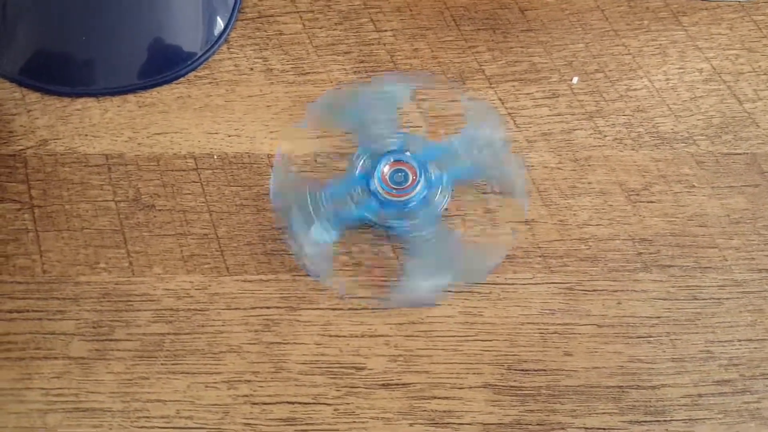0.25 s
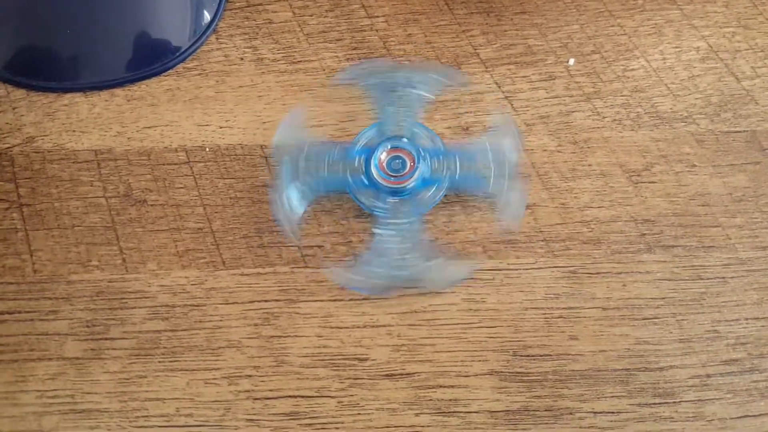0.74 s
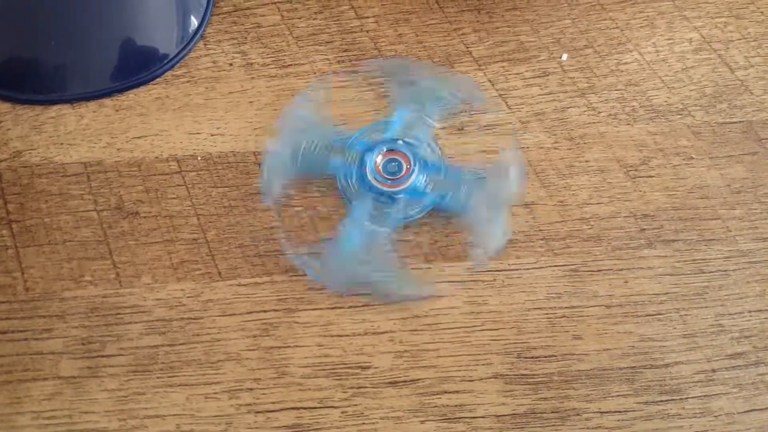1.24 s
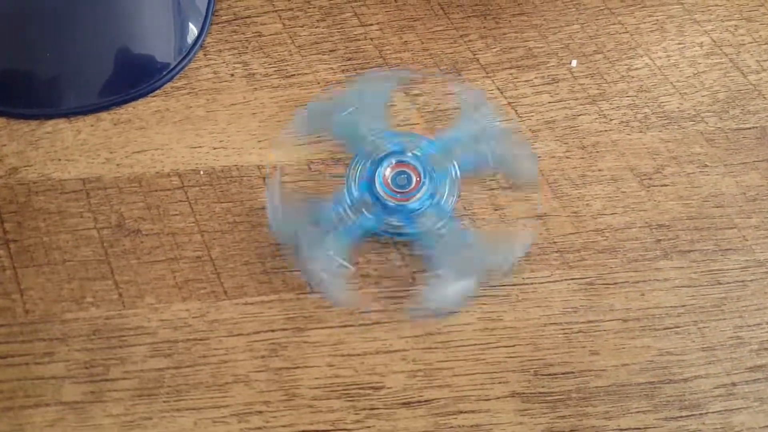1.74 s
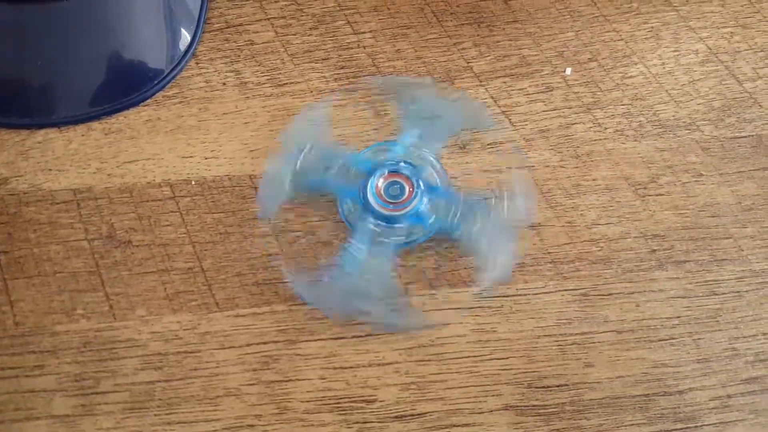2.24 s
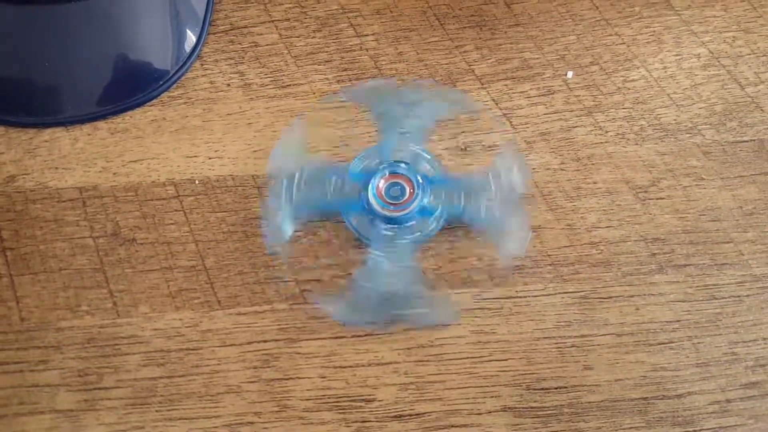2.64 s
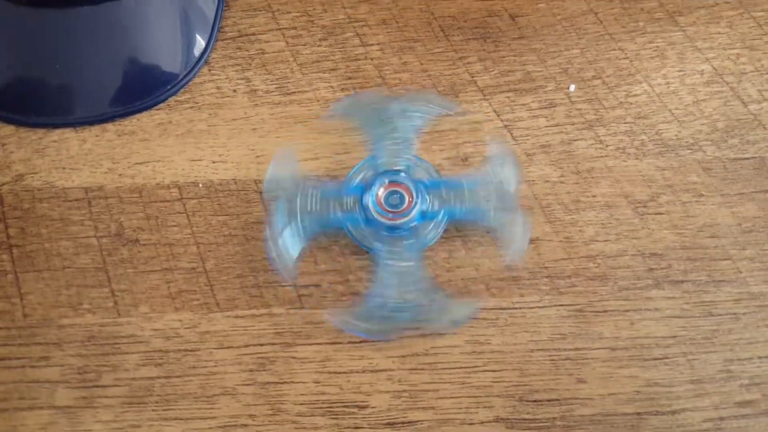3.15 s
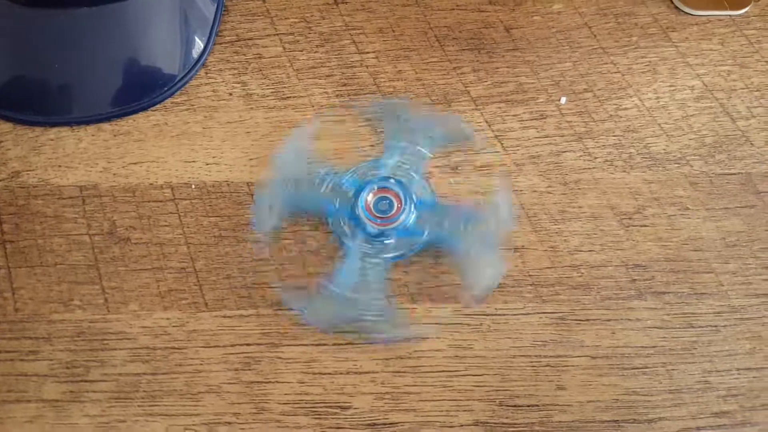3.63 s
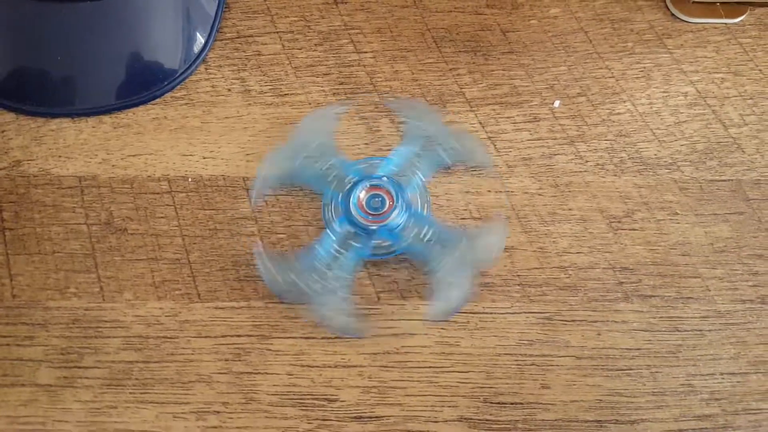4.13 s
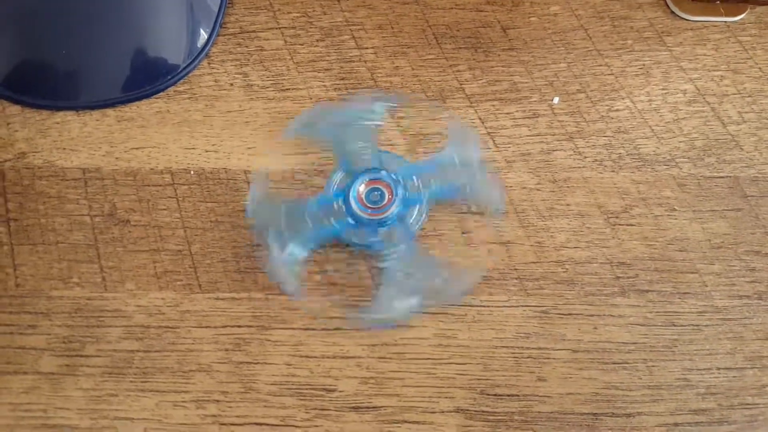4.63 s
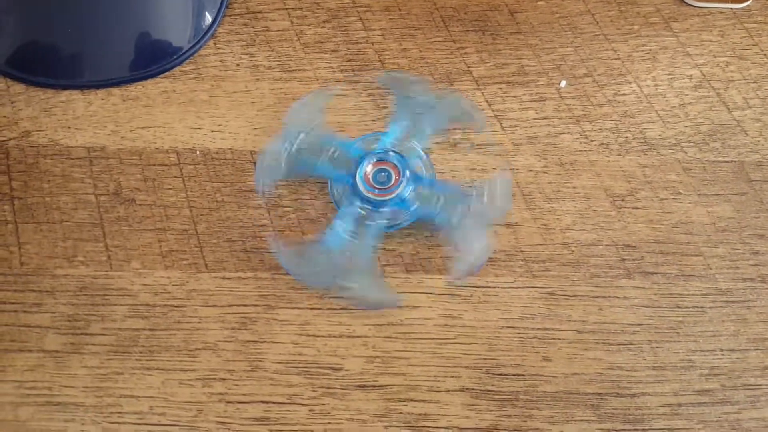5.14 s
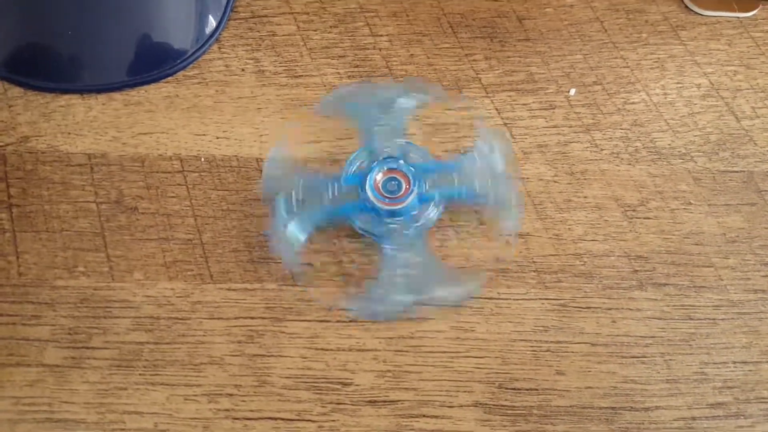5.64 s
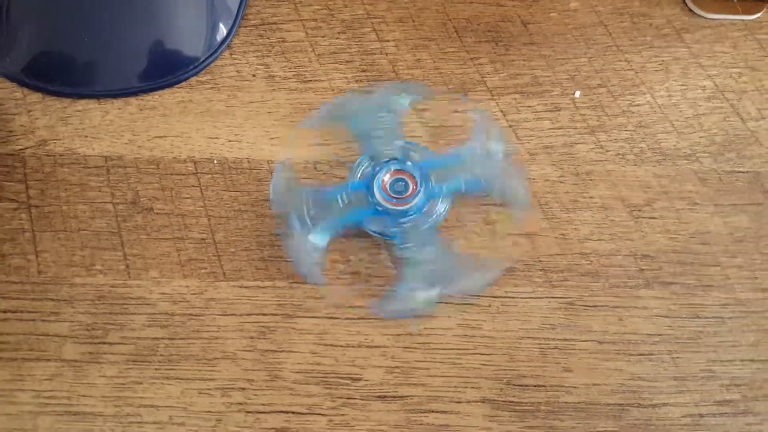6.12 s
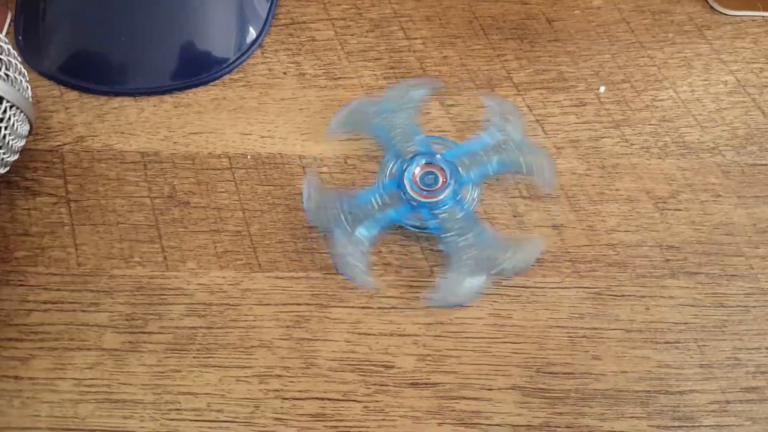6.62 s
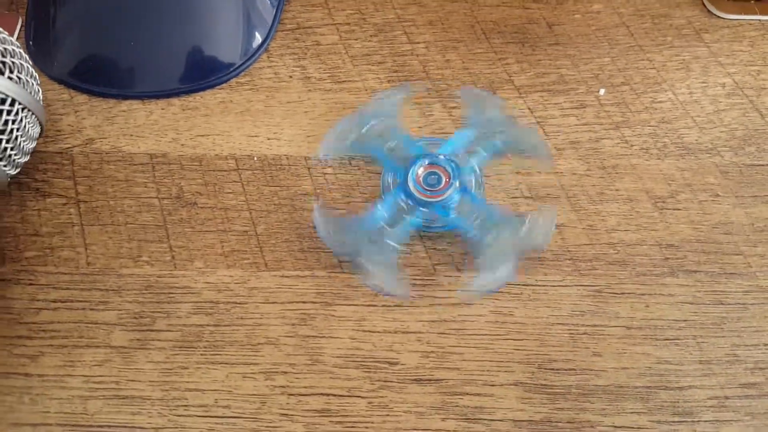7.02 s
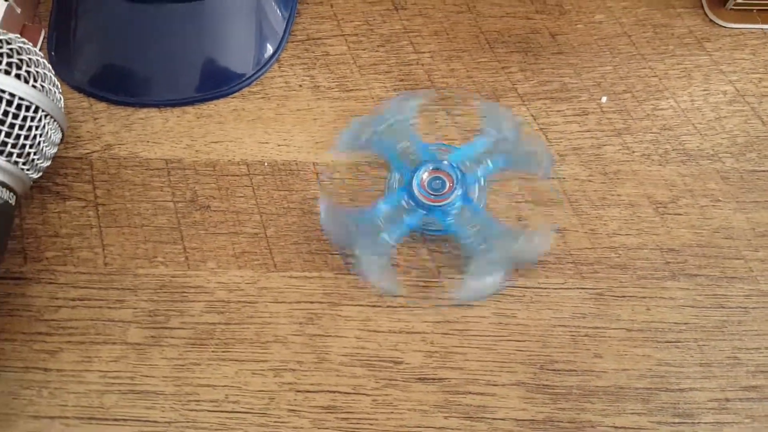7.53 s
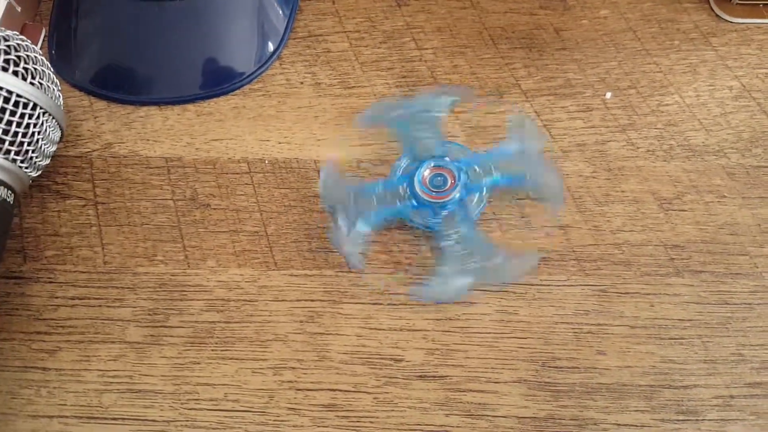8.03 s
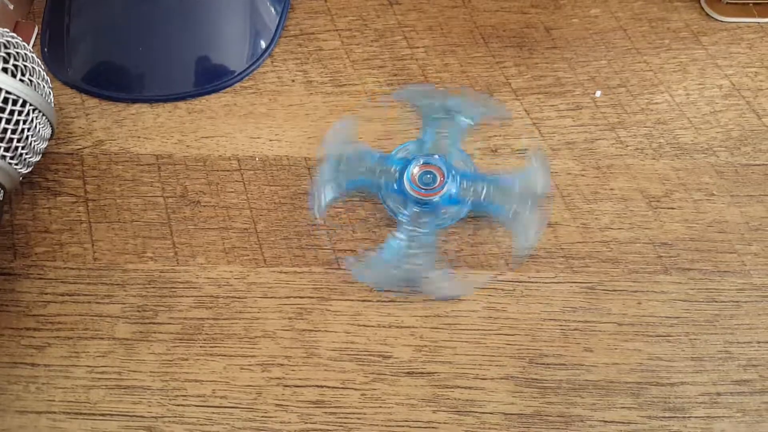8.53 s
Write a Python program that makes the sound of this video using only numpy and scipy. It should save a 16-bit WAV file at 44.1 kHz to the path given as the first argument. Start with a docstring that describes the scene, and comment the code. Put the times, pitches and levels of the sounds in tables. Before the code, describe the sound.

A plastic fidget spinner coasts on a wooden table with a soft, grainy whir. Its steel bearing adds a fine sizzle and light, irregular high ticks. Around the middle, a few small dry knocks, tiny squeaks and brief rubs come close to the microphone. The spinning sound gradually weakens as it slows, while a low appliance hum and room rumble carry on throughout.

```python
"""From the start a plastic fidget spinner coasts on a wooden table while an appliance hums and rumbles.
Its rolling balls excite body and tabletop into a grainy whir, and the steel races into a fine sizzle.
The bearing ticks throughout, with a few brief rubs; mostly from 2.6 to 6 s, something close to the
microphone squeaks and knocks. Midway the ball cage rings more strongly and a faint high whine sets in.
By the end, at almost 9 s, the spin has slowed and the rolling has faded; the hum carries on."""
import sys
import numpy as np
from scipy import signal
from scipy.fft import rfft, irfft
from scipy.io import wavfile
from scipy.ndimage import uniform_filter1d

SR = 44100
rng = np.random.default_rng(int(sys.argv[2]) if len(sys.argv) > 2 else 0)


def dump_mix(stems):
    """Bounce the given channels to the path in sys.argv[1] as a 16-bit WAV at rate SR."""
    frames = np.atleast_2d(stems).T  # one column per channel
    limited = np.clip(frames, -1, 1)  # hard clip at full scale
    pcm = np.round(limited * 32767).astype(np.int16)
    wavfile.write(sys.argv[1], SR, pcm)


N = 386757
TIME = np.arange(N) / SR


def from_db(db):
    """Amplitude ratio of a level in decibels."""
    return 10 ** (np.asarray(db) / 20)


def unit_rms(x):
    """Normalisation to unit mean power."""
    return x / np.sqrt(np.mean(x ** 2) + 1e-20)


def panned(x, pan_db):
    """Constant-power panning: pan is the left level minus the right."""
    return x * unit_rms(from_db([[pan_db / 2], [-pan_db / 2]]))


def at_hz(points, hz):
    """Interpolation of a spectrum over log frequency."""
    centres, values = np.transpose(points)
    return np.interp(np.log(hz + 1e-9), np.log(centres), values)


def drift(corner_hz):
    """Slow random modulation: low-passed noise of rms 1."""
    step = 40
    r = np.exp(-2 * np.pi * corner_hz * step / SR)
    slow = signal.lfilter([1], [1, -2 * r, r * r], rng.standard_normal(N // step + 2002))[2000:]
    return np.interp(np.arange(N) / step, np.arange(len(slow)), unit_rms(slow))


def resonate(x, hz, width_hz):
    """Forced response of a damped resonator with unit peak gain."""
    r = np.exp(-np.pi * width_hz / SR)
    feedback = [1, -2 * r * np.cos(2 * np.pi * hz / SR), r * r]
    return signal.lfilter(np.array([1, 0, -1]) * (1 - r * r) / 2, feedback, x + 1e-18)


def bandpass(x, band_hz):
    """Band limiting with slopes of 12 dB per octave."""
    return signal.sosfilt(signal.butter(2, band_hz, "band", fs=SR, output="sos"), x)


def grains(per_s, spread_db, size=N, coherence=0.41):
    """Shot noise: random impacts of uneven strength, partly correlated between the sides."""
    hits = rng.random(size) < per_s / SR
    common = np.sqrt(coherence) * rng.standard_normal(size)
    separate = np.sqrt(1 - coherence) * rng.standard_normal((2, size))
    return hits * from_db(spread_db * np.clip(rng.standard_normal(size), -2, 2)) * (common + separate)


def add(out, s, sound):
    """Superposition of a short stereo sound at time s."""
    start = max(round(s * SR), 0)
    out[:, start:start + sound.shape[1]] += sound[:, :N - start]


# Room rumble and hiss: (frequency [Hz], relative spectral density [dB])
ROOM_SPECTRUM = [(20, -21), (38, -21.5), (55, -7.5), (72, -11.5), (95, -3.5), (132, -0.5), (155, -5),
                 (175, -4), (210, -11), (250, -8), (285, -11), (350, -11), (445, -23.5), (490, -17.5),
                 (680, -24.5), (1400, -21.5), (2400, -26.5), (3000, -32.5), (3900, -36), (4600, -36.5),
                 (6500, -43), (8300, -43.5), (10300, -44.5), (11400, -48), (13000, -43.5), (14500, -49),
                 (15500, -54)]
# Likeness of left and right in the room: (frequency [Hz], correlation [-1 to 1])
ROOM_CORRELATION = [(60, 1), (150, 0.87), (260, 0.97), (500, 0.78), (900, 0.68), (3000, -0.4),
                    (15000, -0.015)]
def room(level_db=-50):
    """Diffuse field: the sides agree at long wavelengths and lose their likeness at short ones."""
    hz = np.arange(N // 2 + 1) * SR / N
    correlation = np.clip(at_hz(ROOM_CORRELATION, hz), -1, 1)
    mid, side = rfft(rng.standard_normal((2, N))) * from_db(at_hz(ROOM_SPECTRUM, hz))
    air = irfft(np.sqrt(1 + correlation) * mid + np.sqrt(1 - correlation) * side * [[1], [-1]], N)
    return from_db(level_db) * panned(unit_rms(air), pan_db=0.5)


# Mains and motor tones: (frequency [Hz], rms level [dB], modulation depth [0 to 1])
HUM_TONES = [(60.2, -69.5, 0.4), (119.96, -49, 0.18), (166.2, -59.5, 0.56), (218.3, -68.5, 0.6),
             (233.4, -69.5, 0.1), (257.6, -59, 0.2), (296.3, -70, 0.5), (363, -73, 0.58), (484, -71, 0.8)]
def hum():
    """Forced vibration of an appliance: each tone wavers in amplitude and phase."""
    out = np.zeros(N)
    for hz, db, depth in HUM_TONES:
        waver = 1 + depth * (drift(2.86) + 1j * drift(2.24))
        tone = np.real(waver * np.exp(2j * np.pi * (hz * TIME + rng.random())))
        out += from_db(db) * unit_rms(tone)
    return panned(out, pan_db=0.4)


def whine(start_s=3.9, start_db=-91, growth_db_per_s=0.8, pitches_hz=(9750, 9370), waver_hz=12):
    """Frequency modulation: a faint, growing tone wavers and hops between two pitches."""
    hops_s = (5.35, 6.52, 7.56)
    lower = np.searchsorted(hops_s, TIME) % 2
    hz = np.array(pitches_hz)[lower] + waver_hz * drift(12)
    db = start_db + growth_db_per_s * (TIME - start_s) - 3 * lower  # the lower pitch is softer
    return (TIME > start_s) * from_db(db) * np.sqrt(2) * np.sin(2 * np.pi * np.cumsum(hz) / SR)


def reflections(x, t60_s=0.15, level_db=-13):
    """Reverberation: nearby surfaces return a dense, decaying tail, different on each side."""
    t = np.arange(SR // 4) / SR
    tail = rng.standard_normal((2, len(t))) * np.exp(-np.log(1000) * t / t60_s) * (t > .002)
    tail /= np.sqrt(np.sum(tail ** 2, axis=1, keepdims=True))
    return from_db(level_db) * signal.fftconvolve(x, tail, axes=1)[:, :N]


def path_delay(x, lag_s=0.0002):
    """Travel time: the longer path makes the sound arrive later on the right."""
    return np.array([x[0], np.pad(x[1], (round(lag_s * SR), 0))[:N]])


# Short creaky squeaks: (time [s], level [dB], relative overtone level [dB], pitch [Hz], hold [s])
CREAKY_SQUEAKS = [(0.053, -57, -7, 2600, 0.005), (2.607, -55, -11, 2690, 0.0083),
                  (2.6195, -45.5, 2, 2630, 0.0018), (2.635, -60, -9, 2840, 0.0061),
                  (5.610, -63, -16, 2660, 0.0046), (5.734, -55, -20, 2660, 0.0071),
                  (5.757, -62, -7, 2610, 0.005), (5.82, -61, -16, 2670, 0.008),
                  (5.868, -64, -14, 2700, 0.005), (5.913, -69, -14, 2790, 0.004),
                  (5.974, -62, -17, 2790, 0.0071)]
def squeaks(attack_s=0.00088, t60_s=0.024, overtone_t60_s=0.008, jitter_rad=0.063, roughness=0.28):
    """Stick-slip oscillation holds a rough tone and its overtone briefly; then both decay freely."""
    out, t = np.zeros((2, N)), np.arange(SR // 16) / SR
    attack = 1 - np.exp(-t / attack_s)
    for s, db, overtone_db, hz, hold_s in CREAKY_SQUEAKS:
        phase = 2 * np.pi * hz * t + np.cumsum(jitter_rad * rng.standard_normal(len(t)))
        decay = -np.log(1000) * np.maximum(t - hold_s, 0)
        grip = 1 + roughness * unit_rms(uniform_filter1d(rng.standard_normal(len(t)), size=SR // 2000))
        tone = panned(np.sin(phase) * np.exp(decay / t60_s), pan_db=5)
        overtone = panned(np.sin(1.95 * phase) * np.exp(decay / overtone_t60_s), pan_db=-21)
        add(out, s, from_db(db) * np.sqrt(2) * attack * grip * (tone + from_db(overtone_db) * overtone))
    return out


def ring(hz, t60_s, phase_rad=0.31):
    """Free decay of a struck mode, peak 1; the initial phase gives a sharp front edge."""
    t = np.arange(SR // 16) / SR
    wave = -np.sin(2 * np.pi * hz * t + phase_rad) * np.exp(-np.log(1000) * t / t60_s)
    return wave / np.abs(wave).max()


# Dry knocks: (time [s], snap level [dB], snap frequency [Hz], snap pan [dB], thud level [dB])
HANDLING_KNOCKS = [(2.6203, -36, 1600, 4, -55), (3.5724, -27, 1330, -36, -36.5),
                   (5.2551, -36.5, 1400, 4, -37.5), (5.441, -31, 2630, 30, -30),
                   (5.454, -50, 2000, -5, -42)]
def knocks(snap_cycles=4.4):
    """Heavy damping: dry knocks close to the microphone, each a short snap over a dull thud."""
    out = np.zeros((2, N))
    thud = panned(ring(hz=593, t60_s=0.0046), pan_db=-19)
    for s, snap_db, hz, pan, thud_db in HANDLING_KNOCKS:
        snap = panned(ring(hz, snap_cycles / hz), pan)
        add(out, s, from_db(snap_db) * snap + from_db(thud_db) * thud)
    return out


# Brief rubs: (time [s], duration [s], rms level [dB], centre [Hz], bandwidth [Hz], pan [dB])
BRIEF_RUBS = [(0.049, 0.0097, -57, 4080, 1290, -3), (1.795, 0.0053, -45, 11600, 4000, -3),
              (2.599, 0.016, -64, 3900, 1800, -3), (2.618, 0.0058, -60, 8700, 1200, -4),
              (4.558, 0.039, -55, 1500, 2880, -16), (5.419, 0.022, -60.5, 9000, 6000, 9),
              (5.735, 0.008, -63, 3600, 900, -9), (5.748, 0.0064, -58.5, 7000, 1800, -16),
              (5.817, 0.013, -64, 3880, 1400, -6), (8.037, 0.0093, -63, 3780, 2500, -2)]
def rubs():
    """Sliding friction: plastic brushes past in short swells of gritty noise."""
    out = np.zeros((2, N))
    for s, length_s, db, hz, width_hz, pan in BRIEF_RUBS:
        swell = np.hanning(round(length_s * SR))
        grit = grains(per_s=8000, spread_db=2, size=SR // 4)[:, :len(swell)]
        add(out, s, from_db(db) * panned(unit_rms(resonate(grit, hz, width_hz) * swell), pan))
    return out


# Narrow bearing resonances: (frequency [Hz], bandwidth [Hz], initial rms level [dB])
BEARING_MODES = [(1467, 18, -66), (4700, 210, -79.5), (5380, 35, -79.5)]
def singing(waver_db=3.5, fade_db_per_s=2.3):
    """Resonance: the balls keep lightly damped modes of the bearing ringing while it runs fast."""
    impacts = grains(per_s=2500, spread_db=3.5) * from_db(waver_db * drift(4.6))
    modes = sum(from_db(db) * unit_rms(resonate(impacts, hz, width)) for hz, width, db in BEARING_MODES)
    return from_db(-fade_db_per_s * TIME) * panned(modes, pan_db=5)


# Modes of the steel races and balls: (frequency [Hz], bandwidth [Hz], gain [dB], pan [dB])
RACE_MODES = [(3250, 250, -3, 2), (4620, 380, -2, 1), (6000, 600, -5, 4), (7520, 330, 3, 8),
              (8200, 480, -1, 6), (9300, 450, -7.5, 4), (11000, 350, -5.5, -1), (11500, 500, -7.5, 2),
              (12430, 380, -2, 3), (13270, 300, 2, 2), (14020, 300, 0, 2), (14780, 150, -9, 2)]
def races(impacts, drives_db):
    """Modal superposition: each steel mode rings as strongly as the point of contact drives it."""
    return sum(from_db(db) * panned(resonate(impacts * from_db(drive), hz, width), pan)
               for drive, (hz, width, db, pan) in zip(drives_db, RACE_MODES))


def catch(hz, second_hz, second_db, rise_s=0.00076, fall_s=0.0039, width_hz=460):
    """Transient excitation: a flurry of impacts rings the races, most in two bands; greatest rms 1."""
    t = np.arange(SR // 32) / SR
    envelope = (1 - np.exp(-t / rise_s)) * np.exp(-(t / fall_s) ** 2 / 2)
    flurry = grains(per_s=7000, spread_db=5, size=len(t)) * envelope
    octaves_away = np.abs(np.log2(np.array(RACE_MODES)[:, 0] / hz))
    drives_db = 2.5 * rng.standard_normal(len(RACE_MODES)) - 3 * octaves_away
    main = unit_rms(resonate(flurry, hz, width_hz))
    second = from_db(second_db) * unit_rms(resonate(flurry, second_hz, width_hz))
    steel = from_db(-3) * unit_rms(races(flurry, drives_db))
    crack = from_db(-6.5) * unit_rms(flurry)
    tick = bandpass(main + second + steel + crack, band_hz=(4200, 14800))
    tick /= np.sqrt(np.mean(tick ** 2, axis=1, keepdims=True))  # equal power on both sides
    running_power = uniform_filter1d(np.mean(tick ** 2, axis=0), size=SR // 250)
    return tick / np.sqrt(running_power.max())


def light_catches(count, start_db=-63.5, fade_db_per_s=0.6, spread_db=3.5, second_db=-4):
    """Random point process: rows like those of HARD_CATCHES, weaker as the spin runs down."""
    when, first, second = rng.random((count, 3)).T
    strength, side = rng.standard_normal((count, 2)).T
    s = when * N / SR
    db = start_db - fade_db_per_s * s + spread_db * strength
    pan_db = -1 + 3 * side
    upper_hz = np.array([hz for hz, _, gain_db, _ in RACE_MODES if hz > 7000 and gain_db > -3])
    hz, second_hz = upper_hz[(np.array([first, second]) * len(upper_hz)).astype(int)]
    return np.transpose([s, db, hz, second_hz, np.full(count, second_db), pan_db])


# Hard catches of the bearing:
# (time [s], level [dB], main ring [Hz], second ring [Hz], relative second level [dB], pan [dB])
HARD_CATCHES = [(0.17, -65, 13300, 7500, -10, 8), (0.181, -56, 13200, 4730, -12, 5),
                (0.226, -51, 12600, 7540, -4, 10), (0.247, -55, 13300, 5300, -8, 10),
                (0.372, -54, 7800, 5700, -12, 10), (0.443, -58, 13700, 8000, -3, 8),
                (0.463, -55, 8700, 7200, -8, 9), (0.497, -56.5, 7300, 5800, -5, 11),
                (0.549, -57, 13400, 7500, -2, 4), (0.78, -56, 12600, 7500, -3, 10),
                (0.904, -51, 7360, 4300, -9, 9), (0.912, -57, 13100, 4700, -3, 6),
                (1.159, -54.0, 7350, 5800, -6, 8), (1.273, -59, 7200, 4300, -9, 6),
                (1.367, -57, 7900, 4500, -7, 8), (1.374, -54.5, 8100, 4600, -6, 8),
                (1.533, -55.0, 7550, 5300, -9, 6), (1.868, -53, 7500, 9300, -5, 8),
                (1.88, -53.5, 7450, 5400, -7, 7), (1.886, -49.5, 7500, 4400, -10, 8),
                (1.965, -55.5, 13200, 8100, 0, 6), (2.07, -60, 13300, 4600, -5, 3),
                (2.193, -57, 14100, 7100, -2, 8), (2.239, -55.5, 8100, 6500, -6, 6),
                (2.281, -58, 7500, 5300, -9, 12), (2.341, -57.5, 8100, 13400, -2, 5),
                (2.477, -60, 8200, 12200, -1, 5), (2.555, -55, 13300, 7700, -5, 6),
                (2.595, -61.0, 5200, 7600, -5, -1), (2.747, -56.5, 7500, 4800, -9, 10),
                (2.842, -62, 9300, 7700, -2, 6), (2.919, -60, 8100, 4500, -3, 1),
                (3.007, -52.5, 13200, 5300, -11, 3), (3.126, -56, 7600, 4500, -3, 8),
                (3.162, -57, 13300, 7800, -2, 10), (3.214, -60, 8200, 4500, 3, 8),
                (3.27, -58.5, 13300, 7500, -5, 3), (3.283, -53, 13200, 7600, -3, 8),
                (3.287, -49.5, 13200, 7500, -17, 0), (3.317, -62, 7600, 4300, -11, 6),
                (3.492, -58.0, 7600, 13200, -5, 7), (3.638, -58.5, 8200, 10900, -4, 4),
                (3.927, -56.5, 12500, 4700, -12, 5), (3.98, -57, 14000, 7800, -1, 6),
                (4.096, -62, 13900, 11400, -5, 4), (4.204, -63, 14000, 4500, -11, 9),
                (4.21, -51, 13200, 7400, -13, 4), (4.317, -55.5, 13300, 7400, -11, 5),
                (4.364, -54, 12400, 7500, -8, 5), (4.519, -55.5, 13700, 8300, -11, 5),
                (4.617, -57, 14000, 7500, -4, 4), (5.147, -57.5, 13200, 7300, -12, 1),
                (5.257, -56.5, 10500, 4700, -10, -4), (5.297, -57, 14000, 5800, -5, 5),
                (5.313, -63.0, 12500, 14300, -1, 7), (5.439, -48.5, 13500, 4800, -10, 8),
                (5.71, -61, 13000, 7500, -3, 6), (5.826, -60, 13200, 4500, -4, -5),
                (5.982, -57, 13000, 4600, -19, 5), (6.164, -54, 11200, 4630, -2, 4),
                (6.208, -62, 13200, 7400, -3, 7), (6.339, -62, 13900, 5100, -10, 6),
                (6.453, -61.5, 14000, 8600, -6, 9), (6.683, -58.5, 7300, 4600, -7, 4),
                (6.856, -55, 14000, 8400, -1, 3), (7.024, -57.5, 14000, 4700, -16, -1),
                (7.189, -62.5, 13300, 4800, -9, 5), (7.208, -63, 14300, 7200, -4, 6),
                (7.274, -62, 7550, 4500, -7, 6), (7.398, -64, 13200, 4500, -6, 5),
                (7.58, -63.0, 14400, 7800, -5, 5), (7.725, -62.0, 7300, 4400, -9, 6),
                (7.869, -63.5, 7900, 9500, -2, 7), (7.884, -64.0, 9500, 8000, -2, 4),
                (7.904, -58.0, 14100, 8600, -5, 4), (7.914, -49.5, 13300, 11100, -4, 2),
                (7.929, -58, 13400, 6800, -3, 3), (7.986, -63.5, 13400, 7900, -4, 2),
                (8.195, -63, 12300, 4700, -11, 0), (8.377, -64, 14000, 8300, -5, 3),
                (8.559, -60.5, 13200, 4700, -13, 5), (8.572, -63, 14000, 4300, -7, 3)]
def ticks(gain_db=0.05, lead_s=0.0026):
    """Impact noise: every catch of the bearing, hard or light, radiates one tick."""
    out = np.zeros((2, N))
    for s, db, hz, second_hz, second_db, pan in [*HARD_CATCHES, *light_catches(count=130)]:
        add(out, s - lead_s, from_db(db + gain_db) * panned(catch(hz, second_hz, second_db), pan))
    return out


# Moments when the balls run rougher: (time [s], half duration [s], level rise [dB])
ROUGH_SURGES = [(0.2, 0.082, 2.5), (1.29, 0.1, 5), (3.22, 0.12, 5), (4.64, 0.06, 2), (5.3, 0.077, 6),
                (6.4, 0.092, 2), (7.73, 0.04, 8), (8.58, 0.09, 1)]
def sizzle(start_db=-64, fade_db_per_s=1.57, clump_db=1.5, wander_db=3.5, cage_hz=(10500, 13000)):
    """Rolling contact of steel on steel: fine impacts bunch as the cage wanders and ring the races."""
    impacts = unit_rms(grains(per_s=2400, spread_db=0) * from_db(clump_db * drift(31)))
    # From 3.2 to 5.6 s the modes in the band of the ball cage ring more strongly.
    cage_db = 3.5 * np.clip(np.minimum(TIME - 3.2, 5.6 - TIME) / 0.29, 0, 1)
    drives_db = [wander_db * drift(16) + cage_db * (cage_hz[0] < hz < cage_hz[1])
                 for hz, *_ in RACE_MODES]
    ringing = unit_rms(races(impacts, drives_db))
    direct = from_db(-11) * panned(unit_rms(bandpass(impacts, band_hz=(5000, 13000))), pan_db=33)
    surge_db = sum(db * np.exp(-((TIME - s) / half_s) ** 2) for s, half_s, db in ROUGH_SURGES)
    return from_db(start_db - fade_db_per_s * TIME + surge_db) * unit_rms(ringing + direct)


# Modes of the spinner's body and the tabletop: (frequency [Hz], bandwidth [Hz], gain [dB])
BODY_MODES = [(356.7, 65, 5), (489.7, 7.3, 7), (588.6, 15, 2.5), (835, 32, -3), (951, 41, 1.5),
              (1161, 43, 0), (1388, 114, 0.5), (1489, 34, 4), (1545, 60, -2), (1732, 46, -4),
              (1910, 90, -2.5), (2175, 220, -6), (2460, 270, -7.5), (2784, 83, -13.5)]
def whir(start_db=-54.5, fade_db_per_s=0.61, flutter_db=1.5):
    """Structure-borne sound: balls on fine roughness shake body and tabletop, less as the spin slows."""
    impacts = grains(per_s=2500, spread_db=1) * from_db(flutter_db * drift(28))
    modes = sum((-1) ** k * from_db(db) * resonate(impacts, hz, width)
                for k, (hz, width, db) in enumerate(BODY_MODES))
    body = unit_rms(bandpass(modes, band_hz=(220, 3300)))
    return from_db(start_db - fade_db_per_s * TIME) * panned(body, pan_db=2)


def scene():
    """Superposition: the coasting spinner and small nearby noises in front of the humming room."""
    background = hum() + room() + whine()
    spinner = whir() + singing() + sizzle() + ticks()
    nearby = spinner + knocks() + rubs()
    return path_delay(nearby + reflections(nearby) + background) + squeaks()


def record(dry):
    """Band limiting: a steep low-pass removes the treble above 15.8 kHz."""
    return signal.sosfilt(signal.ellip(12, .1, 80, 15800, fs=SR, output="sos"), dry)


dry = scene()
out = record(dry)
dump_mix(out)
```